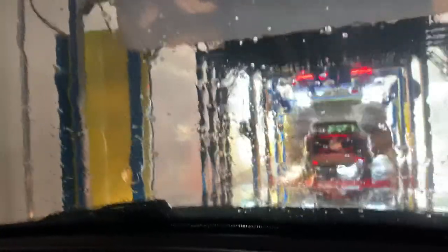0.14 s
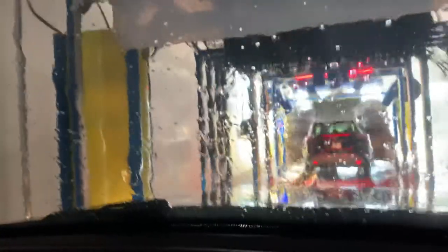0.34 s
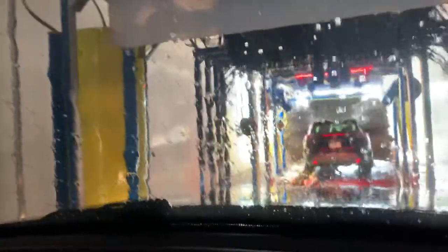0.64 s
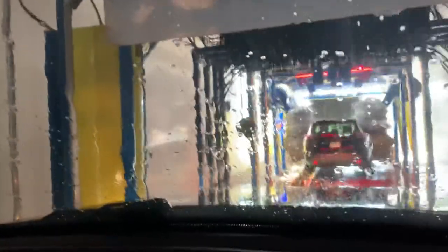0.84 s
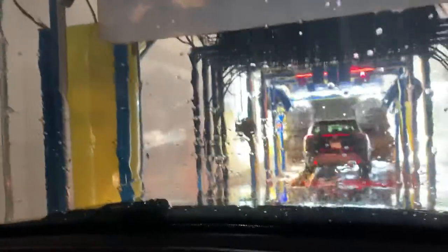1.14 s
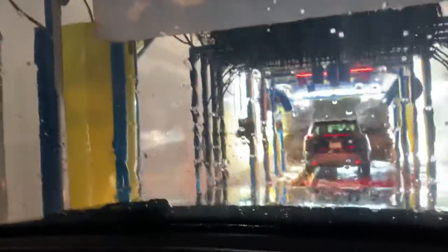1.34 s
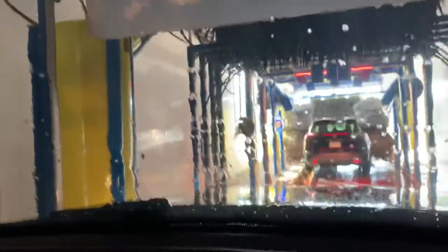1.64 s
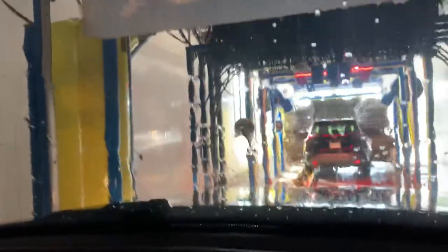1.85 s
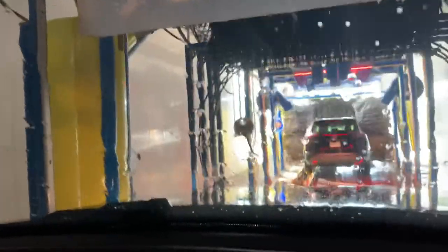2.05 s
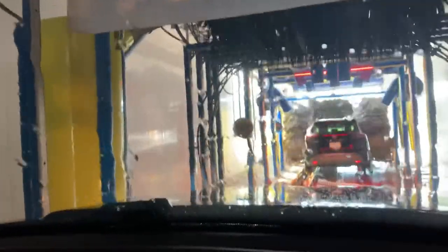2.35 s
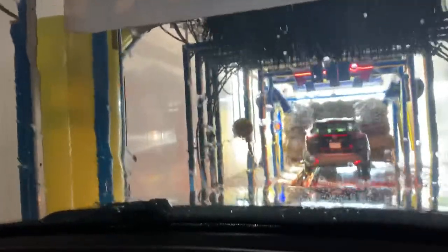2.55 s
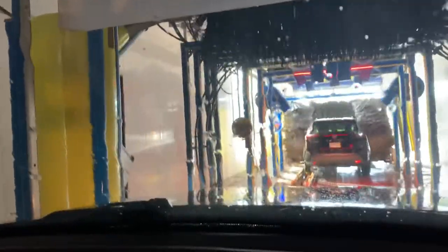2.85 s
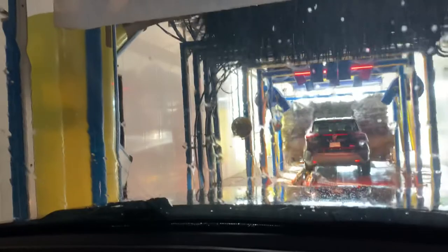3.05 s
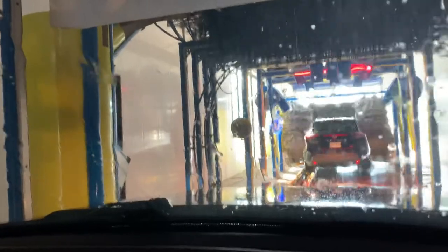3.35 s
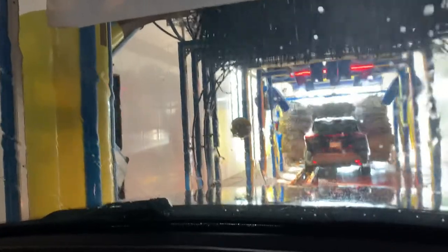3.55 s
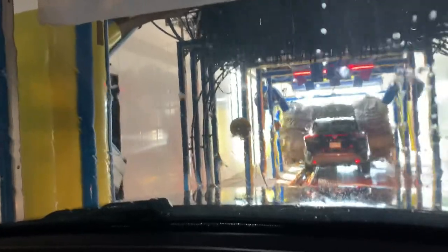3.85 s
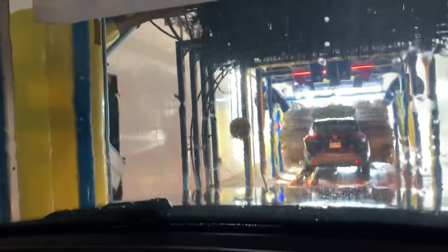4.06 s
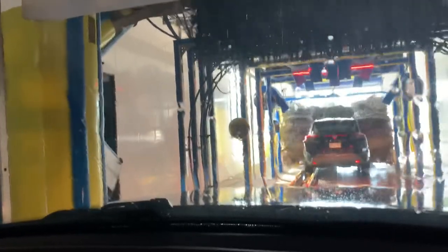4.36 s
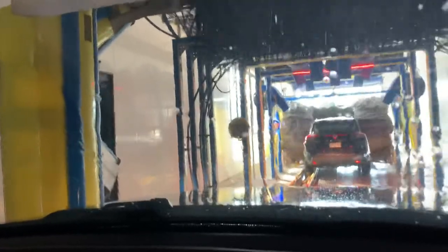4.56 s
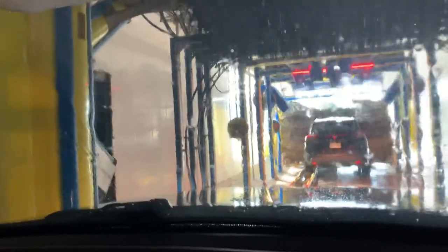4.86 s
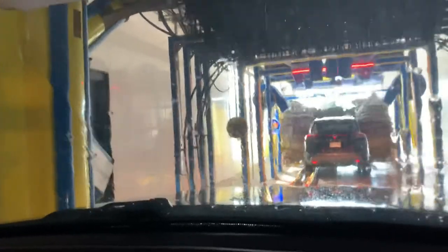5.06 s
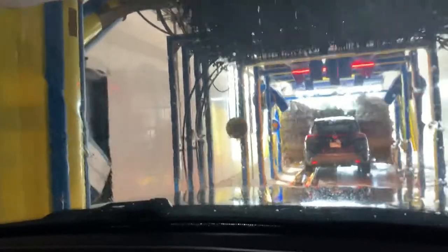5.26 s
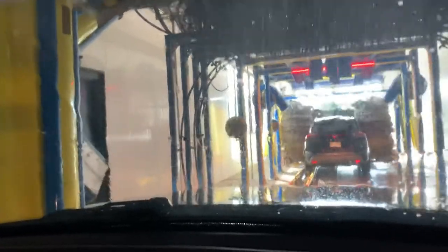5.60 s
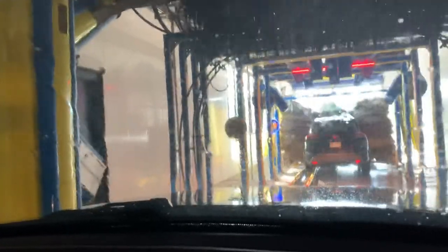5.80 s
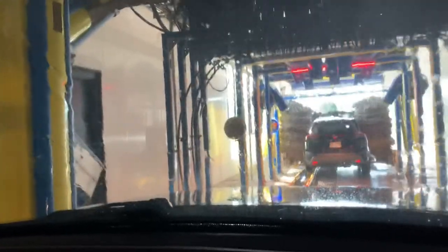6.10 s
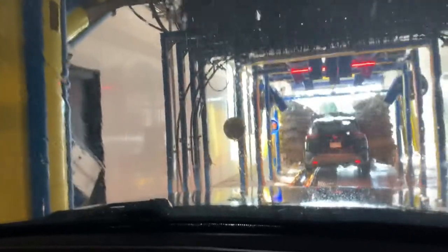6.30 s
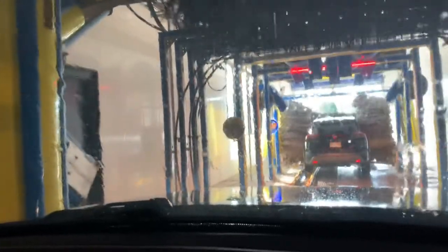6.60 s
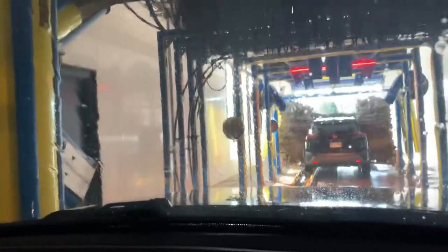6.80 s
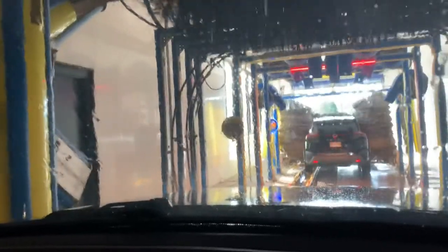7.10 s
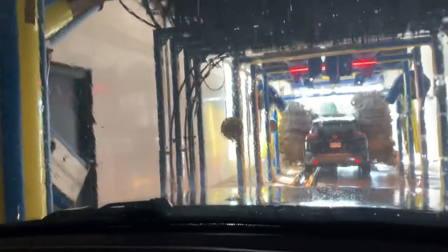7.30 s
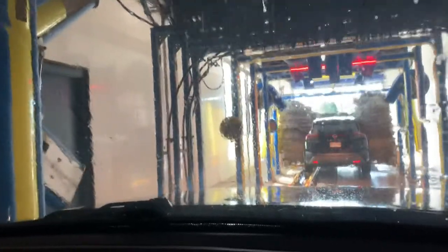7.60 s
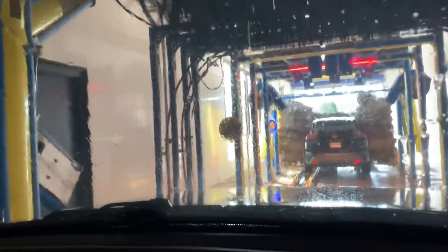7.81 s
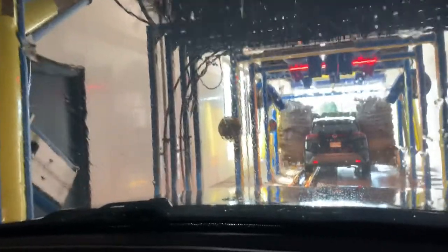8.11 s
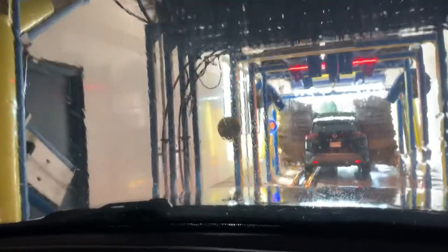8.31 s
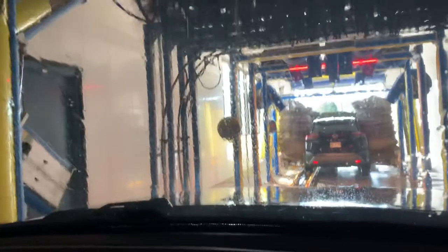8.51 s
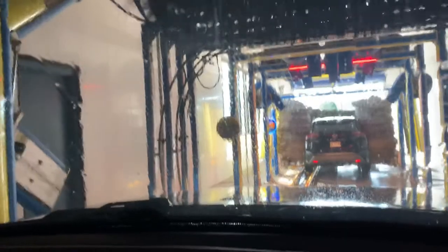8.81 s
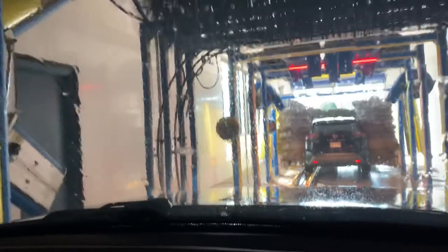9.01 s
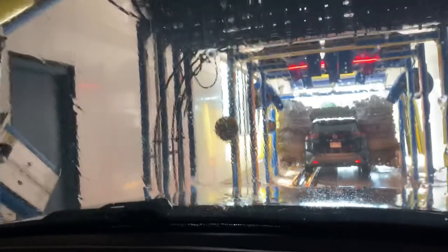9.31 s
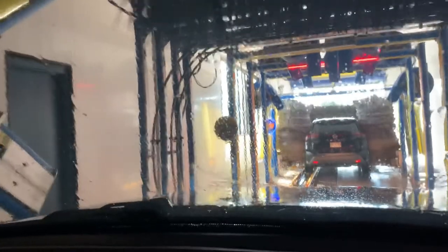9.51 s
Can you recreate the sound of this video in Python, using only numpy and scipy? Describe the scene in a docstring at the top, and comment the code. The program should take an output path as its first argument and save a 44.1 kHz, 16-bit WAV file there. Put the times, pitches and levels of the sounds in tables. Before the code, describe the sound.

Deep steady boom and soft water hiss in a car cabin, scattered taps and splats, then a drumming jet and loud scrubbing cloth blows.

```python
"""Inside a car that rolls through a tunnel car wash, all of it shaped noise bar the door's slow tones.
Machinery booms, water pounds the roof and spray washes over the body; drops tap and sheets splat on glass.
Run-off dribbles and drips ping on metal trim, then a sputtering jet drums across a ringing panel.
Wet cloth brushes arrive, scrub the paint and fling off drops; the door drones, and strips slap the car while
shoves swell the door's bending tones. At the end gushes of water ring a side window."""
import sys
import numpy as np
from scipy import signal
from scipy.fft import rfft, irfft, next_fast_len
from scipy.io import wavfile
from scipy.ndimage import uniform_filter1d, map_coordinates

SR = 44100
rng = np.random.default_rng(int(sys.argv[2]) if len(sys.argv) > 2 else 0)


def log_audio(samples):
    """Write samples as a 16-bit WAV file to the path given in sys.argv[1]."""
    # one column per channel
    frames = np.atleast_2d(samples).T
    # limit to full scale, then quantise
    limited = np.clip(frames, -1, 1)
    pcm = np.round(limited * 32767).astype(np.int16)
    wavfile.write(sys.argv[1], SR, pcm)


N = 425564
SPAN = next_fast_len(N, real=True)  # working length in samples, quick to transform
TIME = np.arange(SPAN) / SR
FREQ = np.fft.rfftfreq(SPAN, 1 / SR)


def amp(db):
    """Decibels to gain."""
    return 10 ** (np.asarray(db) / 20)


def evened(x):
    """Scales to rms 1."""
    return x / np.sqrt(np.mean(x ** 2) + 1e-20)


def read(points, hz):
    """Reads a spectrum table on a log-frequency axis."""
    f, value = np.transpose(points)
    return np.interp(np.log(hz + 1), np.log(f + 1), value)


def curve(rows):
    """Draws a table of (s, value) as a line through every sample."""
    return np.interp(TIME, *np.transpose(rows))


def onset(start_s, rise_s):
    """A gain that ramps from 0 to 1."""
    return np.clip((TIME - start_s) / rise_s, 0, 1)


def release(end_s, db_per_s):
    """A gain that holds at 1, then dies away."""
    return amp(-db_per_s * np.maximum(TIME - end_s, 0))


def passing(top_s, width_s):
    """A gain that swells to 1 and ebbs as something goes by; it is at half at width_s from the top."""
    return 1 / (1 + ((TIME - top_s) / width_s) ** 2)


def add(mix, s, sound):
    """Mixes a sound in at time s."""
    part = mix[:, max(round(s * SR), 0):][:, :sound.shape[1]]
    part += sound[:, :part.shape[1]]


def white():
    """Two unrelated noises."""
    return rng.standard_normal((2, SPAN))


def colour(x, points):
    """Gives x a spectrum that falls away past the ends of its table, at rms 1."""
    low_skirt = FREQ / (FREQ + points[0][0] / 2)
    high_skirt = 1 / (1 + (FREQ / (2 * points[-1][0])) ** 4)
    shape = amp(read(points, FREQ)) * low_skirt * high_skirt
    return evened(irfft(rfft(x) * shape, SPAN))


def wander(low_hz, high_hz):
    """Slow random movement between two rates, rms 1."""
    band = FREQ / (FREQ + low_hz) / (1 + (FREQ / high_hz) ** 2)
    return evened(irfft(rfft(rng.standard_normal(SPAN)) * band, SPAN))


def ring(x, modes):
    """Passes x through resonances (Hz, width in Hz, dB) of alternating sign."""
    response = 0
    for k, (hz, width, db) in enumerate(modes):
        resonance = 1j * FREQ * width / (hz ** 2 - FREQ ** 2 + 1j * FREQ * width)
        response = response + (-1) ** k * amp(db) * resonance
    return irfft(rfft(x) * response, SPAN)


def splash(hz, octaves, decay, rise=0.00086, tail_db=-16, tail=0.0051, size=4096):
    """A noise burst around hz with the cabin's short tail (times in s), near rms 1 at its loudest."""
    t, f = np.arange(size) / SR, np.fft.rfftfreq(size, 1 / SR)
    band = 1 / (1 + (np.log2((f + 1) / hz) / octaves) ** 2) ** 2
    fall = np.exp(-t / decay) + amp(tail_db) * np.exp(-t / tail)
    shape = (1 - np.exp(-t / rise)) ** 2 * fall
    noise = evened(irfft(rfft(rng.standard_normal((2, size))) * band, size))
    return noise * shape / shape.max()


def click(hz):
    """The broad, sharp instant at which a drop lands."""
    return splash(hz, octaves=1.0, decay=0.001, rise=.0002, tail_db=-26)


def crackly(x, depth_db=-0.5, size=40):
    """Breaks a burst into uneven grains about `size` samples long, at much the same strength."""
    grain = evened(uniform_filter1d(rng.standard_normal(x.shape[1]), size=size))
    return x * evened(amp(depth_db * grain))


def patter(per_s, low_hz, high_hz, octaves, decay, spread_db, count=120):
    """Random small impacts of many pitches and sizes, rms 1."""
    taps = [splash(hz, octaves, decay) for hz in np.geomspace(low_hz, high_hz, count)]
    out = np.zeros((2, SPAN))
    for when, which, chance in rng.random((int(per_s * N / SR), 3)):
        size = amp(spread_db * min(-np.log(chance), 3))
        add(out, when * N / SR, size * taps[int(which * count)])
    return evened(out)


def grit(per_s, spread_db):
    """A dense crackle of one-sample impacts of uneven size, rms 1."""
    sizes = amp(spread_db * np.minimum(rng.exponential(1, SPAN), 3))
    landed = rng.random(SPAN) < per_s / SR
    return evened(white() * sizes * landed)


def patchy(x, depth_db, long, wide_hz, size=512):
    """Patches of time (long, in s) and pitch swell and fade as water lands here and there; lows stay steadier."""
    hz, _, z = signal.stft(x, SR, nperseg=size)
    depth = depth_db * (hz ** 2 / (hz ** 2 + 800 ** 2))[:, None]
    across = np.arange(z.shape[2]) * size / 2 / SR / long
    up = np.arange(z.shape[1]) * SR / size / wide_hz
    frames, bins = np.meshgrid(across, up)
    field = map_coordinates(rng.standard_normal((200, 1200)), [bins, frames], order=1, mode="wrap")
    return signal.istft(z * amp(depth * evened(field)), nperseg=size)[1][:, :SPAN]


# Machinery heard through the body. Each row: frequency in Hz, relative level in dB per Hz.
MACHINERY_SPECTRUM = [(15, -19), (28, -17), (39, -1), (47, -0.5), (56, 9.5), (68, -3.5), (82, -4.5),
                      (112, -1), (145, -10), (178, -4), (250, -9.5), (350, -16.5), (600, -35.5)]
# Water pounding the roof. Each row: frequency in Hz, relative level in dB per Hz.
ROOF_SPECTRUM = [(40, -20), (65, -7), (90, 4.5), (120, -5), (150, -13.5), (280, -20), (500, -25),
                 (1000, -77)]
# the machinery is steady until the car leaves it behind
RUMBLE_DB, RUMBLE_UNTIL_S, RUMBLE_FADE_DB_PER_S = -15.5, 6.5, 1.5
# the roof is pounded until the car is out from under the first arch
ROOF_DB, ROOF_UNTIL_S, ROOF_FADE_DB_PER_S = -18, 1.53, 8.5


def machinery(steadiness=0.36):
    """Motors and conveyor boom in the cabin at a fairly even strength; water pounds the roof."""
    boom = colour(white(), MACHINERY_SPECTRUM)
    strength = np.sqrt(abs(uniform_filter1d(boom ** 2, size=2200, axis=1)) + 1e-9)
    boom = evened(boom / strength ** steadiness)  # partly levels out the swells
    boom = boom * release(RUMBLE_UNTIL_S, RUMBLE_FADE_DB_PER_S)
    roof = colour(white(), ROOF_SPECTRUM) * release(ROOF_UNTIL_S, ROOF_FADE_DB_PER_S)
    return amp(RUMBLE_DB) * boom + amp(ROOF_DB) * roof


# How much spray reaches the body. Each row: time in seconds, relative level in dB.
SPRAY_LEVEL = [(0, -34), (1.0, -32), (2.0, -32.5), (3.0, -32.5), (3.8, -34.5), (5.0, -35.5), (5.8, -35)]
# Spray on the body. Each row: frequency in Hz, relative level in dB per Hz.
SPRAY_SPECTRUM = [(100, -6.5), (230, -1), (360, -7), (470, -9.5), (590, -12.5), (720, -13), (920, -17.5),
                  (1170, -21.5), (1420, -24), (1630, -22), (1850, -29), (2300, -31), (3200, -36),
                  (5500, -42), (7500, -51.5), (10000, -55), (13000, -63.5), (16000, -67)]


def spray():
    """A gusting wash of fine water with separate drops and soft splatters in it."""
    water = white() + .7 * grit(per_s=1500, spread_db=2)
    fine = patchy(water, depth_db=2.4, long=.03, wide_hz=420)
    gusts = amp(.7 * wander(5, 23))
    wash = colour(fine * gusts, SPRAY_SPECTRUM) * amp(11.5)
    specks = patter(per_s=150, low_hz=2400, high_hz=8900, octaves=0.58, decay=0.00084, spread_db=6.5)
    splatters = patter(per_s=60, low_hz=1100, high_hz=4430, octaves=0.42, decay=0.0055, spread_db=2.0)
    layers = wash + specks * amp(-22.5) + splatters * amp(-14.0)
    return layers * amp(curve(SPRAY_LEVEL))


# Large drops on the glass. Each row: time in seconds, level in dB, centre in Hz,
# treble in dB relative to that level.
GLASS_DROPS = [(0.676, -44, 2340, 10), (0.881, -34.5, 4270, -2), (1.263, -38, 1920, 9),
               (1.498, -33.5, 2540, -24), (1.608, -39, 2010, 7), (2.31, -31.5, 3400, -20),
               (2.361, -27.5, 2200, -22), (2.459, -33, 3400, -8), (2.533, -26, 2380, -26),
               (2.788, -29.5, 1530, -5), (2.8993, -29, 1610, -8), (2.931, -31, 3820, 0.5),
               (2.999, -34, 1730, 1), (3.057, -36.5, 2780, -4), (3.1767, -34.5, 3000, -18),
               (3.238, -38.5, 2210, 8), (3.305, -28, 3440, -23), (3.4244, -22.5, 2350, -25),
               (3.9457, -29, 1660, -3), (4.3841, -29, 1950, -9), (4.616, -33, 3880, -10),
               (4.9106, -34.5, 3220, -10), (6.2632, -33.5, 3150, -8)]
# Heavy drips that ping on metal trim. Each row: time in seconds, relative level in dB, pitch in Hz.
METAL_DRIPS = [(4.796, -28, 3100), (5.5508, -25.5, 2950), (6.059, -30, 3120), (6.2113, -27, 3180),
               (6.341, -32.5, 4000), (6.625, -30, 4240), (7.48, -24, 3200), (7.671, -23, 3750),
               (8.3017, -27, 3120), (8.395, -27.5, 3540), (8.484, -27, 3400), (8.738, -27.5, 3160),
               (8.9286, -31, 3760)]


def drops(click_db=-3, drip_click_db=-11):
    """Single drops: a click, a ragged ring and a fine splash on glass, a click and a ping on metal."""
    out = np.zeros((2, SPAN))
    for s, db, hz, treble_db in GLASS_DROPS:
        body = splash(hz, octaves=0.86, decay=0.006, tail_db=-14, tail=.013)
        add(out, s - .001, amp(db) * crackly(body, depth_db=0.5))
        add(out, s, amp(db + click_db) * click(hz))
        fine = splash(4900, octaves=1.0, decay=0.00095, rise=0.00081, tail_db=-12)
        add(out, s - .001, amp(db + treble_db) * fine)
    for s, db, hz in METAL_DRIPS:
        ping = splash(hz, octaves=0.56, decay=0.007, rise=.0015, tail_db=-16, tail=.016)
        add(out, s - .001, amp(db - 2.5) * ping)
        add(out, s, amp(db + drip_click_db) * click(hz))
    return out


# Sheets of water that splat on the windshield. Each row: time in seconds, level in dB,
# centre in Hz, decay in seconds.
WINDSHIELD_SPLATS = [(1.1941, -33, 2300, 0.026), (1.24, -33.5, 1650, 0.013), (1.324, -44, 1500, 0.0066),
                     (1.7, -38.5, 3500, 0.016), (1.869, -33.5, 2500, 0.022), (1.896, -25.5, 1330, 0.016),
                     (2.5717, -32, 1800, 0.017), (2.68, -36, 2120, 0.02), (2.831, -32, 1990, 0.019),
                     (3.426, -28.5, 1660, 0.014), (3.96, -32, 3300, 0.014), (4.118, -34, 2480, 0.011),
                     (4.356, -35, 2660, 0.031), (4.455, -36.5, 3500, 0.014), (4.62, -32, 4160, 0.011),
                     (4.918, -36.5, 3960, 0.024), (5.432, -35, 3570, .01)]


def splats():
    """Water that lands flat spreads for a moment, with a soft, grainy hiss."""
    out = np.zeros((2, SPAN))
    for s, db, hz, decay in WINDSHIELD_SPLATS:
        add(out, s - .004, amp(db) * crackly(splash(hz, octaves=1.0, decay=decay, rise=0.0018)))
    return out


# run-off swells and ebbs between the arches
DRIBBLE_S, DRIBBLE_WIDTH_S, DRIBBLE_DB = 5.93, 1.66, -45.5


def dribble():
    """Run-off dribbles thickly on the trim, which rings in a broad cluster of pitches."""
    beads = patter(per_s=420, low_hz=2500, high_hz=4800, octaves=0.7, decay=0.006, spread_db=3.0)
    trim = ring(beads, [(3100, 300, -2), (3420, 340, -6), (4200, 650, -7.5)])
    return evened(trim) * amp(DRIBBLE_DB) * passing(DRIBBLE_S, DRIBBLE_WIDTH_S) ** 2


# Sweeps of the jet across the panel. Each row: start in seconds, end in seconds, level in dB.
JET_SWEEPS = [(5.874, 5.88, -24), (5.909, 5.937, -21), (5.967, 5.998, -20.5), (6.024, 6.134, -19.5),
              (6.173, 6.24, -20.5), (6.24, 6.3, -19), (6.332, 6.38, -17.5), (6.407, 6.45, -16),
              (6.58, 6.62, -24.5), (6.67, 6.733, -23.5), (6.787, 6.81, -20.5), (6.83, 6.863, -19),
              (6.93, 6.949, -18.5), (7.11, 7.148, -24)]
# The panel under the jet. Each row: frequency in Hz, relative level in dB per Hz.
JET_SPECTRUM = [(200, -26), (320, -3), (425, 7), (475, -3), (530, 5.5), (590, -23), (700, -17), (810, -22),
                (960, -13), (1300, -15.5), (2000, -24), (5000, -66)]
# What that panel rings with. Each row: frequency in Hz, width in Hz, relative level in dB.
JET_PANEL_MODES = [(419, 24, -3), (530, 36, -2.5), (636, 15, 3), (736, 20, -1.5), (822, 15, -11)]
JET_RISE_S, JET_FADE_DB_PER_S = 0.018, 220


def jet(ring_db=-4, drum_db=-2):
    """A sputtering jet drums on a panel and sets it ringing each time it sweeps across."""
    sweeps = [amp(db) * onset(start, JET_RISE_S) * release(end, JET_FADE_DB_PER_S)
              for start, end, db in JET_SWEEPS]
    water = white() * amp(1.5 * wander(6.1, 30))
    drumming = amp(drum_db) * colour(water, JET_SPECTRUM)
    ringing = amp(ring_db) * evened(ring(white(), JET_PANEL_MODES))
    return (drumming + ringing) * np.max(sweeps, axis=0)


# the brush presses hardest on the door for a while; the cloth then flaps more
PRESS_S, PRESS_WIDTH_S = 8.67, 0.45
# each blow drags cloth and water after it, which ebb until the next blow or for WAKE_S
WAKE_DB, WAKE_FADE_DB_PER_S, WAKE_S = 4.5, 132, 0.061


def wake():
    """A gain that jumps with every slap and sags after it, most while the brush presses hardest."""
    blows = np.sort([0] + [row[0] for row in CLOTH_SLAPS])
    age = TIME - blows[np.searchsorted(blows, TIME, "right") - 1]
    sag_db = WAKE_FADE_DB_PER_S * np.minimum(age, WAKE_S)
    level_db = uniform_filter1d(WAKE_DB - sag_db, size=500)
    return amp(level_db * passing(PRESS_S, PRESS_WIDTH_S))


# Wet cloth scrubbing. Each row: frequency in Hz, relative level in dB per Hz.
SCRUB_SPECTRUM = [(150, -5), (330, -3), (400, -26), (500, -5), (570, -18.5), (630, -3.5), (700, -8),
                  (820, -12), (1000, -16.5), (1330, -14.5), (1650, -17), (2200, -22.5), (3000, -29.5),
                  (4200, -35), (5500, -40), (10000, -45.5), (14000, -52), (16000, -68)]
# Moments when more of the cloth bears on the paint. Each row: top in seconds, half width in seconds,
# level in dB that is added to the steady contact.
BRUSH_SWELLS = [(6.84, 0.16, -31), (7.09, 0.05, -28.5), (7.3, 0.16, -27), (7.5, 0.027, -30),
                (8.8, 0.041, -25.5)]
# the brush leans in until it lies against the car
BRUSH_START_S, BRUSH_RISE_S, BRUSH_DB = 6.375, 0.29, -26.5


def scrub(strips_hz=19.0, beat_db=3.0, flutter_db=0.0, pressed_flutter_db=2,
          fizz_db=-1.5, brightest_s=7.5, bright_width_s=1.0):
    """Wet strips drag and crackle over the paint, surging with each row, more wildly when pressed in."""
    turns = np.cumsum(strips_hz * (1 + 0.068 * wander(0.31, 3.1))) / SR
    flutter_depth = flutter_db + pressed_flutter_db * passing(PRESS_S, PRESS_WIDTH_S)
    flutter = flutter_depth * wander(3.6, 27)
    surge = amp(beat_db * np.sin(2 * np.pi * turns) + flutter)
    hits = grit(per_s=3000, spread_db=2.0) + 0.75 * white()
    cloth = colour(patchy(hits, depth_db=2.5, long=.025, wide_hz=582) * surge, SCRUB_SPECTRUM)
    # the treble is held back except around brightest_s
    fizz = signal.sosfiltfilt(signal.butter(1, 4000, "high", fs=SR, output="sos"), cloth)
    cloth = cloth + fizz * (amp(fizz_db) * passing(brightest_s, bright_width_s) - 1)
    contact = amp(BRUSH_DB) + sum(amp(db) * passing(s, width) for s, width, db in BRUSH_SWELLS)
    return cloth * contact * onset(BRUSH_START_S, BRUSH_RISE_S) * wake()


# the shower of water flung off the brush: thickest moment, half width, level
FLUNG_S, FLUNG_WIDTH_S, FLUNG_DB = 7.7, 1.3, -37


def flung(blobs_db=-2):
    """Spinning cloth throws off fine drops that pepper the paint and fat ones with a pitched pat."""
    fine = patter(per_s=600, low_hz=1500, high_hz=5000, octaves=0.5, decay=0.0014, spread_db=3.8)
    blobs = patter(per_s=260, low_hz=1390, high_hz=4900, octaves=0.36, decay=0.0022, spread_db=5.5)
    shower = amp(FLUNG_DB) * passing(FLUNG_S, FLUNG_WIDTH_S) * onset(BRUSH_START_S, BRUSH_RISE_S) * wake()
    return (fine * amp(-2.0) + blobs * amp(blobs_db)) * shower


# Door resonances. Each row: frequency in Hz, width in Hz, relative level in dB.
DOOR_MODES = [(176, 12, -3.5), (195, 14, 3), (261, 9.9, -6.5), (334, 39, -12), (481.6, 26, -10),
              (533, 21, -8.5), (617, 48, -9), (763, 38, -8.5), (980, 37, -16), (1180, 14, -12.5),
              (1337, 15, -12.5), (2026, 32, -22.5)]
# The three slow modes in which the door bends: low, middle and high, each a frequency in Hz.
FLEX_HZ = [179, 258.6, 495]
# Heavy shoves of the brush against the door. Each row: widest swing in seconds,
# then the level in dB of the low, the middle and the high bending mode.
DOOR_THUMPS = [(7.973, -15, -32, -34), (8.02, -19, -30, -32), (8.05, -13.5, -32, -25),
               (8.097, -11, -21, -26), (8.199, -10.5, -15, -21), (8.398, -15.5, -8, -17.5),
               (8.468, -8.5, -33, -31), (8.6, -9, -14, -44), (8.677, -9, -29, -30), (8.715, -8, -11.5, -30),
               (8.787, -9, -18, -34), (8.856, -3.5, -28, -20), (8.913, -10.5, -24, -19),
               (8.957, -14, -11, -20), (8.99, -11, -16, -18.5), (9.116, -12, -27, -21),
               (9.16, -16, -12, -20), (9.189, -6, -27, -27), (9.246, -8, -26, -23), (9.36, -31, -8, -15),
               (9.434, -9.5, -42, -39), (9.511, -25, -12.5, -25), (9.583, -15, -16, -18.5),
               (9.63, -21, -11.5, -16)]
# the door drones once the cloth lies on it
DOOR_START_S, DOOR_RISE_S, DOOR_DB = 6.87, 2.07, -21.5
# the leaning brush keeps the lowest bending mode humming
HUM_START_S, HUM_RISE_S, HUM_DB = 7.9, 0.1, -20.5


def door(push=0.0054, scatter=0.027, rub_db=2, size=4096):
    """Rubbing cloth keeps the door humming; shoves swell slow modes whose pitch wavers as it bends."""
    t = np.arange(size) / SR
    swell = (t / push / 4) ** 4 * np.exp(4 - t / push)  # tops at 1 after four times push (in s)
    swings = np.zeros((len(FLEX_HZ), SPAN))
    for s, *levels in DOOR_THUMPS:
        add(swings, s - t[swell.argmax()], amp(levels)[:, None] * swell)
    swings[0] = np.hypot(swings[0], amp(HUM_DB) * onset(HUM_START_S, HUM_RISE_S))
    flex = np.zeros((2, SPAN))
    for hz, swing in zip(FLEX_HZ, swings):
        bend = np.array([wander(3, 15), wander(3, 15)])
        turns = np.cumsum(hz * (1 + scatter * bend), axis=1) / SR
        flex += swing * np.sin(2 * np.pi * turns)
    rubbing = white() * amp(rub_db * wander(5.2, 10))
    drone = evened(ring(rubbing, DOOR_MODES)) * amp(DOOR_DB) * onset(DOOR_START_S, DOOR_RISE_S)
    return ports(flex + drone)


# The hardest blows of the cloth. Each row: time in seconds, relative level of the wet smack in dB,
# level of the thwack in dB, centre of the thwack in Hz.
CLOTH_SLAPS = [(7.0916, -49, -25.5, 1500), (7.315, -45, -23.5, 1580), (7.499, -37, -21, 1290),
               (7.597, -36.5, -32, 1300), (7.625, -54, -22, 1150), (7.67, -33.5, -33, 600),
               (7.813, -33.5, -33, 950), (7.889, -33.5, -24, 850), (7.9552, -44, -24, 1250),
               (8.0061, -29.5, -22.5, 1260), (8.08, -32.5, -26, 1070), (8.131, -29, -19.5, 720),
               (8.189, -29.5, -15, 1000), (8.248, -32.5, -34, 1100), (8.33, -32.5, -23, 1170),
               (8.3717, -29.5, -19.5, 800), (8.439, -33, -32.5, 1800), (8.5117, -28.5, -32, 1000),
               (8.543, -34, -28, 620), (8.5762, -39, -30, 950), (8.646, -29.5, -26, 900),
               (8.706, -28, -19.5, 1060), (8.7582, -31, -21, 715), (8.7854, -32, -22, 850),
               (8.85, -26, -20.5, 720), (8.8953, -31, -25.5, 1000), (8.963, -36, -35, 2600),
               (9.0167, -26, -21.5, 765), (9.111, -34.5, -30, 600), (9.1686, -32.5, -27, 700),
               (9.229, -37.5, -38, 1500)]


def slaps(lead_s=0.0077, knock_db=-2, beads_db=-5.0, scatter_s=0.033, count=8):
    """Each strip lands with a crackling smack, a duller thwack and a hollow knock, and sheds ticking drops."""
    out = np.zeros((2, SPAN))
    for s, smack_db, thwack_db, hz in CLOTH_SLAPS:
        smack = crackly(splash(3520, octaves=1.25, decay=0.005, rise=0.015, tail=.009))
        add(out, s - lead_s, amp(smack_db - 1) * smack)
        add(out, s - .005, amp(thwack_db) * splash(hz, octaves=1.35, decay=0.009, rise=0.0054))
        knock = splash(340, octaves=0.51, decay=0.011, rise=0.006)
        add(out, s - .003, amp(thwack_db + knock_db) * knock)
        for late, pitch in rng.random((count, 2)):
            bead = splash(1600 * 5 ** pitch, octaves=.55, decay=.0012, rise=.0002, tail_db=-24)
            bead_db = smack_db + beads_db + 4.2 * (1 - late)  # later drops are weaker
            add(out, s + scatter_s * late ** 2, amp(bead_db) * bead)
    return out


# Gushes over the side window. Each row: top in seconds, level in dB.
GUSHES = [(9.36, -25.5), (9.45, -29), (9.556, -23), (9.635, -29)]
# Side window resonances. Each row: frequency in Hz, width in Hz, relative level in dB.
WINDOW_MODES = [(493, 9, 2), (1180, 25, 8), (1260, 45, -5), (1530, 69, 2.5), (2010, 26, -1),
                (2280, 130, -21), (2950, 140, -28)]
# Water sweeping the side window. Each row: frequency in Hz, relative level in dB per Hz.
WINDOW_WASH = [(700, -3), (1900, -1.5), (2800, -5), (5000, -26)]
GUSH_WIDTH_S = 0.026


def rush(wash_db=-6):
    """Gushes of water sweep the side window with a broad wash and ring its modes."""
    flow = sum(amp(db) * passing(s, GUSH_WIDTH_S) for s, db in GUSHES)
    water = white() * amp(3.5 * wander(8, 40))
    ringing = evened(ring(water, WINDOW_MODES))
    return (ringing + amp(wash_db) * colour(water, WINDOW_WASH)) * flow


def cabin(x, echo_db=-9, count=14):
    """Close echoes off glass and dashboard ripple the treble."""
    taps = np.zeros((2, SPAN))
    at = (SR * rng.uniform(.002, .014, (2, count))).astype(int)
    np.put_along_axis(taps, at, rng.choice([-1, 1], at.shape) / np.sqrt(count), 1)
    echoes = amp(echo_db) * rfft(taps) * FREQ ** 2 / (FREQ ** 2 + 700 ** 2)
    return irfft(rfft(x) * (1 + echoes), SPAN)


# Likeness of the two microphone ports. Each row: frequency in Hz, left-right likeness from -1 to 1.
LIKENESS = [(60, .97), (200, .88), (280, .5), (400, .42), (500, .45), (615, -.75), (730, -.15), (860, -.55),
            (1100, .1), (1400, -.35), (1620, -.75), (2000, 0), (2300, .15), (2650, -.3), (3200, .2),
            (4000, .1), (9000, -.03)]
# Sound that runs along the axis of the ports. Each row: frequency in Hz, share from 0 to 1.
AXIAL = [(1500, 0), (3000, .15), (6400, .4), (8600, .1), (10000, .85), (12000, .96)]
# Balance of the ports. Each row: frequency in Hz, left minus right in dB.
BALANCE_DB = [(60, -2.4), (270, -1.2), (335, 2.5), (430, 0), (1000, 1.2), (2000, .2), (4500, 1),
              (7500, -1.2), (8400, -4.5), (10000, 0)]
PORT_DELAY_S = .000294


def ports(x, lag=0.33):
    """Two ports a hand apart: alike in the bass, combed in the treble by sound arriving from both sides."""
    comb = read(AXIAL, FREQ) * np.cos(2 * np.pi * FREQ * PORT_DELAY_S)
    same = np.clip(read(LIKENESS, FREQ) + comb, -.99, .99)
    a, b = rfft(x)
    mid = a * np.sqrt((1 + same) / 2)
    side = b * np.sqrt((1 - same) / 2)
    bass_lag = np.exp(-.5j * lag / (1 + (FREQ / 350) ** 4))  # in the bass the left trails by `lag` radians
    lean = amp(read(BALANCE_DB, FREQ) / 2) * bass_lag
    return irfft(np.array([(mid + side) * lean, (mid - side) / lean]), SPAN)


def scene(right_db=1.0):
    """Everything as it reaches the front seat; the jet and the door lean to the right."""
    around = machinery() + spray() + dribble() + drops() + splats() + scrub() + flung() + slaps() + rush()
    right = (ports(jet()) + door()) * amp([[-right_db], [right_db]])
    return (ports(cabin(around)) + right)[:, :N]


EDGE_HZ = 15750


def record(dry):
    """The ports' own resonance, a soft ceiling on the biggest peaks, then the band limit."""
    bright = dry + .5 * signal.lfilter(*signal.iirpeak(8350, Q=9, fs=SR), dry)
    held = bright / (1 + (bright / .98) ** 10) ** .1
    lowpass = signal.firwin(511, EDGE_HZ, window=("kaiser", 9), fs=SR)
    return signal.oaconvolve(held, lowpass[None], "same")


dry = scene()
out = record(dry)
log_audio(out)
```